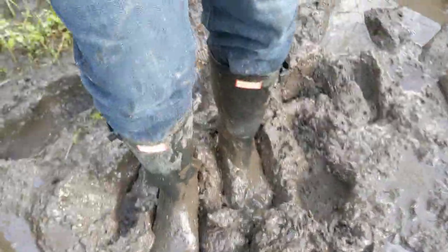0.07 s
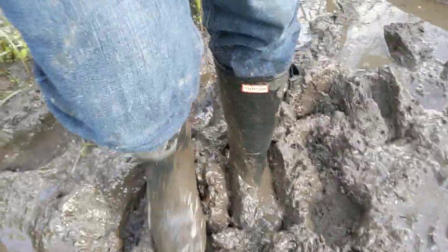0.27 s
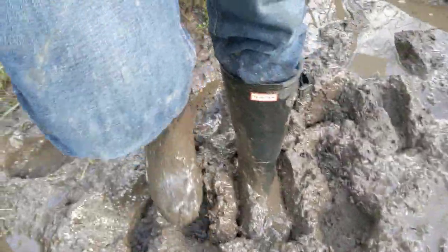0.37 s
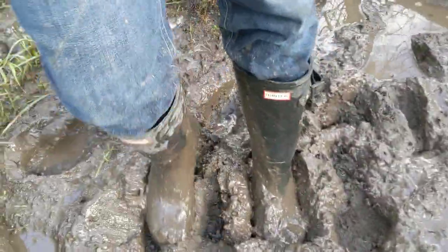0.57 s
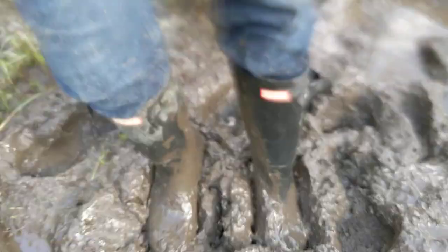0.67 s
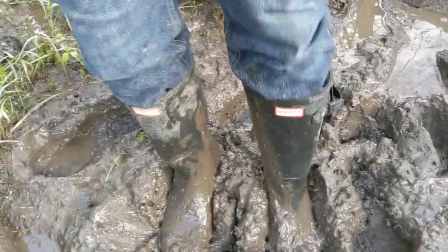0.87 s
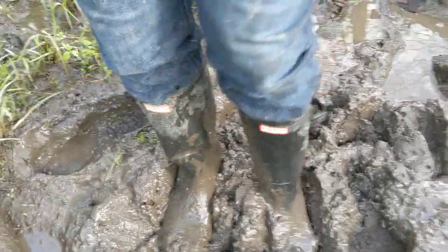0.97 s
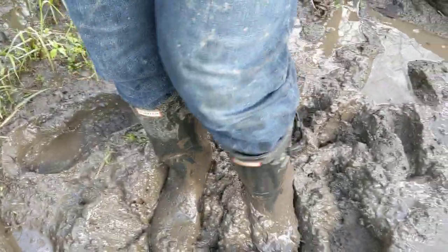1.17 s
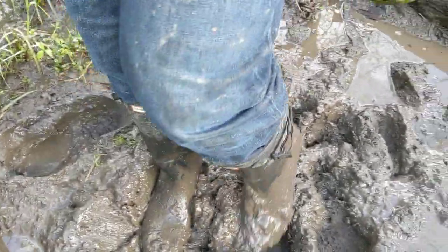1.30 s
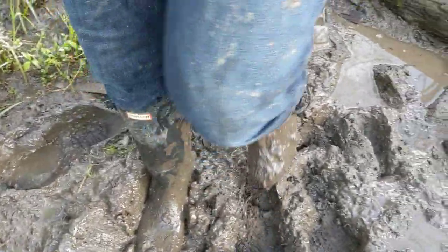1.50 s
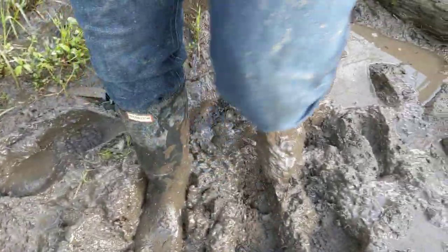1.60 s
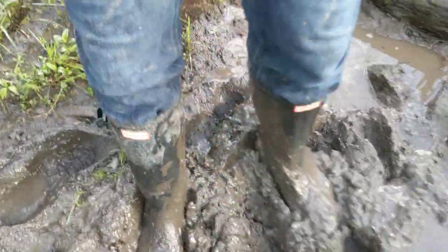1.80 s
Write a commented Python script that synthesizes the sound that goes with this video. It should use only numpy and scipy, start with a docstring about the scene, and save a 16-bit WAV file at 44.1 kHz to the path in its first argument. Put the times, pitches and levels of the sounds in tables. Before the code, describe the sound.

Rubber boots squelch in thick wet mud, close by. The loudest squelch comes at about 0.3 seconds, with sharp pops of air. Lighter ones follow at 0.7 and 1.3 seconds, and a faint squish at 1.8. Between them, specks tick down and the mud fizzes softly. From about 1 second, a distant bird whistles faint, mostly falling notes over a steady low outdoor rumble.

```python
"""Rubber boots in thick wet mud

Outdoors, close below a stereo microphone: one loud squelch, then two lighter ones. Air and slurry
squirt through cavities under the sole, pockets pop, specks tick down and the settling mud fizzes.
Far off, a bird whistles mostly falling notes over a low rumble."""
import sys
import numpy as np
from scipy import signal
from scipy.fft import rfft, irfft
from scipy.io import wavfile
from scipy.ndimage import uniform_filter1d

SR = 44100
rng = np.random.default_rng(int(sys.argv[2]) if len(sys.argv) > 2 else 0)


def generate_wav(sig):
    """Save sig (samples, or channels by samples) to the path in sys.argv[1] as 16-bit PCM at SR."""
    pcm = np.round(np.clip(np.atleast_2d(sig).T, -1, 1) * 32767).astype(np.int16)
    wavfile.write(sys.argv[1], SR, pcm)


N = 81585
TIME = np.arange(N) / SR

# Tone of the open air, the wet spray and the low slosh: (frequency [Hz], relative level [dB])
AIR_SPECTRUM = [(20, -9.5), (40, -3.5), (62, -1), (90, -5.5), (130, -5.5), (200, -13), (367, -20),
                (600, -19), (900, -17), (1200, -24), (1800, -35.5), (2900, -32), (4800, -41), (9700, -45.5),
                (16000, -45)]
SPRAY_SPECTRUM = [(900, -2.5), (1600, 2), (3300, 1), (4700, -3.5), (5800, 3), (7000, -12.5), (8200, -2),
                  (9700, 3), (10800, -5), (12000, 7), (13500, -8), (15800, 5)]
SLOSH_SPECTRUM = [(60, -8), (130, -10), (260, -1.5), (380, -2), (600, -5), (1000, -1.5), (2000, -10),
                  (5000, -22.5), (12000, -21.5)]
# How alike the open air is on left and right: (frequency [Hz], coherence [0-1])
AIR_COHERENCE = [(60, 1), (180, 0.96), (550, 0.26), (1650, 0.03), (4970, 0.01), (15000, 0)]
# Distant whistles: (start [s], glide [s], hold [s], from [Hz], to [Hz], level [dB], waver [share of pitch])
BIRD_NOTES = [ (-0.03, 0.049, 0.085, 2300, 2650, -61, 0.073), (0.99, 0.055, 0.015, 3020, 2623, -57, 0.027),
              (1.049, 0.019, 0.084, 2526, 2428, -56.5, 0.0073),
              (1.439, 0.044, 0.013, 4250, 3986, -56.5, 0.015),
              (1.499, 0.094, 0.0089, 3990, 3158, -53.5, 0.03),
              (1.53, 0.049, 0.15, 3750, 3554, -60.5, 0.083), (1.668, 0.032, 0.053, 2930, 2735, -61, 0.0083),
              (1.765, 0.019, 0.019, 2790, 2794, -51, 0.014)]
# Fizz of the settling mud: (time [s], level [dB])
SEEP_ENVELOPE = [(0, -61), (0.19, -60), (0.355, -56.5), (0.5, -65.5), (0.6, -87), (0.76, -53), (0.87, -60),
                 (1.0, -62.5), (1.15, -64.5), (1.24, -64.5), (1.33, -54), (1.42, -57), (1.59, -58.5),
                 (1.68, -63.5), (1.85, -55.5)]
# Air pockets bursting: (time [s], pitch [Hz], level [dB], t60 [s], pan L-R [dB])
POCKET_POPS = [ (0.076, 1550, -40, 0.017, -3.5), (0.2092, 692, -27.5, 0.026, -5),
               (0.250, 271, -25.5, 0.055, -1), (0.2588, 3280, -4, 0.0055, -5),
               (0.2643, 3580, -7, 0.0061, -6), (0.2655, 2290, -2.5, 0.005, -7),
               (0.278, 1770, -10, 0.0057, 2), (0.300, 3220, -12.5, 0.0062, -4),
               (0.306, 3270, -15.5, 0.008, -3), (0.3129, 2037, -26, 0.034, -4),
               (0.3183, 1840, -7, 0.0083, -1.5), (0.6611, 700, -23.5, 0.016, 1),
               (0.6618, 3070, -22.5, 0.0092, -11), (0.6719, 1530, -20.5, 0.0074, -2),
               (0.7114, 1274, -13.5, 0.0071, -2), (0.7993, 1650, -32, 0.0084, -1),
               (0.7999, 834, -39.5, 0.043, 2), (0.808, 2240, -36.5, 0.0058, -21),
               (0.8133, 1760, -29.5, 0.0059, -1), (0.8244, 1500, -33, 0.0079, 3),
               (0.8488, 2430, -40, 0.014, -21), (1.2652, 1560, -3.5, 0.0036, 0.5),
               (1.293, 1200, -25.5, 0.017, 0), (1.474, 3460, -33.5, 0.0072, -16)]
# Slurry forced from under a boot: (peak time [s], rise [s], t60 [s], cavity pitch [Hz],
# cavity width [Hz], cavity level [dB], slosh level [dB], spray level [dB], pan L-R [dB])
SOLE_SQUIRTS = [ (0.245, 0.014, 0.075, 667, 270, -27.5, -31, -58, -2),
                (0.264, 0.023, 0.16, 9700, 1000, -39, -53, -57, -14),
                (0.264, 0.011, 0.11, 2530, 2400, -22, -25.5, -36.5, -0.5),
                (0.277, 0.0063, 0.071, 2460, 1960, -25, -32.5, -34, 0),
                (0.306, 0.0032, 0.06, 3030, 920, -35, -39, -40, -2),
                (0.321, 0.0063, 0.046, 1870, 920, -35, -65, -35.5, -10),
                (0.662, 0.0093, 0.23, 3600, 1570, -52, -75, -38, -5.5),
                (0.67, 0.012, 0.052, 748, 507, -41, -66, -57, -4),
                (0.693, 0.0088, 0.27, 1800, 2560, -54, -49, -53, 4),
                (0.705, 0.0057, 0.1, 2280, 2140, -38, -38.5, -34, -3.5),
                (0.796, 0.002, 0.058, 12100, 900, -47.5, -68, -60, -6),
                (0.8, 0.0022, 0.043, 1810, 1420, -42, -69, -44, -3),
                (1.242, 0.0058, 0.043, 1370, 573, -34.5, -58, -28.5, -4.5),
                (1.2434, 0.005, 0.03, 6340, 1530, -28, -41, -40, 0),
                (1.2667, 0.00073, 0.091, 2280, 2430, -35, -58, -43, -15.5),
                (1.277, 0.0097, 0.087, 1930, 2340, -36, -34.5, -32.5, 0),
                (1.347, 0.0066, 0.056, 3420, 670, -46, -55, -48, -7),
                (1.384, 0.0028, 0.037, 3730, 1490, -49.5, -45, -48, 2.5),
                (1.792, 0.0043, 0.078, 3370, 3000, -66, -64, -52, -7),
                (1.835, 0.0057, 0.077, 3500, 1500, -54, -52, -53, -2)]
# Specks snapping and landing: (time [s], peak level [dB], pitch [Hz], pan L-R [dB])
SPECK_TICKS = [ (0.2617, -23.5, 10200, -10), (0.2745, -19.5, 9800, -7), (0.3186, -29.5, 10200, -2),
               (0.353, -36.5, 4040, 5), (0.6304, -34.5, 3420, -6.5), (0.6584, -43, 12000, -6),
               (0.6607, -24, 4700, -9), (0.7022, -26, 8600, -12), (0.7518, -32, 9800, -8),
               (0.7887, -36, 14000, 2), (0.8154, -22, 8800, 4), (0.819, -37, 7500, 0),
               (0.8303, -35, 5960, -3), (0.9454, -41.5, 9200, -4), (1.0283, -37, 12700, 3),
               (1.0530, -37.5, 7040, -6), (1.1612, -50, 5530, -2), (1.3495, -36, 7040, -9),
               (1.4509, -31.5, 12600, -6)]


def from_db(db):
    """Decibels to gain."""
    return 10 ** (np.asarray(db) / 20)


def unit_rms(x):
    """Scale to unit power."""
    return x / np.sqrt(np.mean(x ** 2) + 1e-20)


def fade(t, t60):
    """Hold at 1 until t = 0, then fall 60 dB every t60 seconds."""
    return np.exp(-np.log(1000) * np.maximum(t, 0) / t60)


def panned(pan_db):
    """Left and right gains; positive is to the left of the microphone."""
    return from_db(np.array([[.5], [-.5]]) * pan_db)


def per_bin(points):
    """A (frequency, value) table read at every FFT bin."""
    hz, value = np.transpose(points)
    return np.interp(np.log(np.fft.rfftfreq(N, 1 / SR) + 1), np.log(hz), value)


def coloured(x, spectrum):
    """Shape a steady sound by a spectrum, at unit power."""
    return unit_rms(irfft(rfft(x) * from_db(per_bin(spectrum)), N))


def resonance(x, hz, width_hz, order=2):
    """Band-pass around a centre frequency."""
    low = np.sqrt(hz ** 2 + width_hz ** 2 / 4) - width_hz / 2
    high = min(low + width_hz, .47 * SR)
    return signal.sosfilt(signal.butter(order, [low, high], "band", fs=SR, output="sos"), x)


def drift(rate_hz):
    """Random wander below rate_hz, at unit power."""
    lowpass = signal.butter(2, rate_hz, fs=SR, output="sos")
    return unit_rms(signal.sosfilt(lowpass, rng.standard_normal(2 * N))[N:])


def grains(per_s, spread_db, pan_spread_db=4.5):
    """Random clicks of uneven size, each reaching the microphone from its own direction."""
    at = np.flatnonzero(rng.random(N) < per_s / SR)
    sizes = from_db(spread_db * np.minimum(rng.exponential(1, N), 4)) * rng.choice([-1, 1], N)
    left, right = sizes * panned(pan_spread_db * rng.standard_normal(N))
    lag_samples = rng.integers(-3, 4, N) // 2
    out = np.zeros((2, N))
    out[0, at] = left[at]
    out[1, (at + lag_samples[at]) % N] = right[at]
    return out


def evened(x):
    """Hold the power steady over a few milliseconds, keeping the grain."""
    power = uniform_filter1d(np.mean(x ** 2, axis=0), size=300)
    return x / np.sqrt(np.abs(power) + 1e-12)


def echoes(x, t60, low_hz):
    """Diffuse reflections above low_hz, different on left and right."""
    response = rng.standard_normal((2, N)) * fade(TIME, t60)
    response /= np.sqrt(np.sum(response ** 2, axis=1, keepdims=True))
    response = signal.sosfilt(signal.butter(2, low_hz, "high", fs=SR, output="sos"), response + 1e-18)
    return signal.fftconvolve(np.atleast_2d(x), response, axes=1)[:, :N]


def add(out, start_s, sound):
    """Mix a short sound in at start_s."""
    i = int(start_s * SR)
    out[:, i:i + sound.shape[1]] += sound[:, :N - i]


def open_air(level_db=-49):
    """Rumble and hiss all around the microphone, alike on both sides only in the bass."""
    coherence = np.clip(per_bin(AIR_COHERENCE), 0, 1)
    mid, side = rfft(rng.standard_normal((2, N)))
    stereo = irfft(np.sqrt(1 + coherence) * mid + np.sqrt(1 - coherence) * side * [[1], [-1]], N)
    return from_db(level_db) * coloured(stereo, AIR_SPECTRUM)


def distant_bird(fade_s=0.03, rasp_hz=251, echo_db=-2):
    """Far-off whistles, pure or raspy, swell as they slide to a held pitch and linger in the open."""
    song = np.zeros(N)
    for start, glide, hold, from_hz, to_hz, db, waver in BIRD_NOTES:
        t = TIME - start
        hz = np.interp(t, [0, glide], [from_hz, to_hz]) * (1 + waver * drift(rasp_hz))
        gate = np.clip(np.minimum(t, glide + hold + fade_s - t) / fade_s, 0, 1)
        swell = np.interp(t, [0, glide], [0.4, 1])
        song += from_db(db) * gate * swell * np.sqrt(2) * np.sin(2 * np.pi * np.cumsum(hz) / SR)
    return song + from_db(echo_db) * echoes(song, t60=0.95, low_hz=500)


def seep(per_s=6000, bands=14, low_hz=1396, high_hz=13900, t60_cycles=7.9):
    """Tiny bubbles burst in the settling mud, each ringing a few cycles at its own pitch."""
    fizz = np.zeros((2, N))
    for hz in np.geomspace(low_hz, high_hz, bands):
        radius = from_db(-60 * hz / (t60_cycles * SR))
        angle = 2 * np.pi * hz / SR
        tilt = from_db(2.5 * np.log2(hz / low_hz))  # higher bubbles are struck harder
        clicks = grains(per_s / bands, spread_db=2.5) * tilt
        fizz += signal.lfilter([0, np.sin(angle)], [1, -2 * radius * np.cos(angle), radius ** 2],
                               clicks + 1e-18)
    level = from_db(np.interp(TIME, *np.transpose(SEEP_ENVELOPE)))
    return level * coloured(fizz, SPRAY_SPECTRUM) * panned(pan_db=-2.0)


def pops(attack_s=0.00033, rise_per_s=8.5, overtone_ratio=1.49, overtone_db=-13, crack_db=-20.5):
    """An air pocket cracks open and rings briefly, rising in pitch as its mouth widens."""
    out, t = np.zeros((2, N)), TIME[:SR // 20]
    attack = 1 - np.exp(-t / attack_s)
    for start, hz, db, t60, pan_db in POCKET_POPS:
        phase = 2 * np.pi * hz * (t + rise_per_s * t ** 2 / 2)
        ring = (np.sin(phase) + from_db(overtone_db) * np.sin(overtone_ratio * phase)) * fade(t, t60)
        film = unit_rms(resonance(rng.standard_normal(len(t)), hz=2300, width_hz=2500))
        crack = from_db(crack_db) * film * fade(t, t60=0.018)
        add(out, start, from_db(db) * (ring + crack) * attack * panned(pan_db))
    return out


def droplets(per_s=9000, bands=18):
    """Wet crackle: every bursting film rings briefly at a pitch of its own."""
    return sum(resonance(grains(per_s / bands, spread_db=3), hz, width_hz=0.15 * hz, order=1)
               for hz in np.geomspace(700, 14500, bands))


def squirts(films_per_s=3500, spread_db=3):
    """Swells of tiny bursting films ring a cavity under the sole, with low slosh and crackling spray."""
    cavities, slosh_power, spray_power = np.zeros((3, 2, N))
    for peak, rise, t60, hz, width_hz, cavity_db, slosh_db, spray_db, pan_db in SOLE_SQUIRTS:
        t = TIME - peak
        swell = np.exp(-(np.minimum(t, 0) / rise) ** 2)
        flow = swell * fade(t, t60) * panned(pan_db)
        ring = evened(resonance(grains(films_per_s, spread_db), hz, width_hz, order=3))
        cavities += flow * from_db(cavity_db) * ring
        slosh_power += (flow * from_db(slosh_db)) ** 2
        spray_power += (flow * from_db(spray_db)) ** 2
    slosh = np.sqrt(slosh_power) * evened(coloured(grains(films_per_s, spread_db), SLOSH_SPECTRUM))
    spray = np.sqrt(spray_power) * evened(coloured(droplets(), SPRAY_SPECTRUM))
    return cavities + slosh + spray


def ticks(spatter_db=-23):
    """A wet speck snaps sharply and leaves a faint spatter."""
    out, t = np.zeros((2, N)), TIME[:SR // 20]
    envelope = fade(t, t60=0.004) + from_db(spatter_db) * fade(t, t60=0.057)
    for start, db, hz, pan_db in SPECK_TICKS:
        snap = resonance(rng.choice([-1, 1], len(t)) * envelope, hz, width_hz=10000, order=1)
        add(out, start, from_db(db) * snap / np.abs(snap).max() * panned(pan_db))
    return out


def scene(scatter_db=-1, tail_db=-26):
    """Mud up close, widened by reflections off boots and ruts; a faint tail, bird and open air beyond."""
    mud = squirts() + pops() + ticks() + seep()
    scatter = echoes(mud.mean(axis=0), t60=0.012, low_hz=2740)[0]
    near = from_db(scatter_db) * scatter * [[1], [-1]]  # opposite polarity spreads the image
    tail = from_db(tail_db) * echoes(mud, t60=0.53, low_hz=306)
    return mud + near + tail + distant_bird() + open_air()


def record(dry, cutoff_hz=15800):
    """A steep low-pass takes the very top off the microphone signal."""
    return signal.sosfilt(signal.ellip(12, .1, 80, cutoff_hz, fs=SR, output="sos"), dry)


dry = scene()
out = record(dry)
generate_wav(out)
```